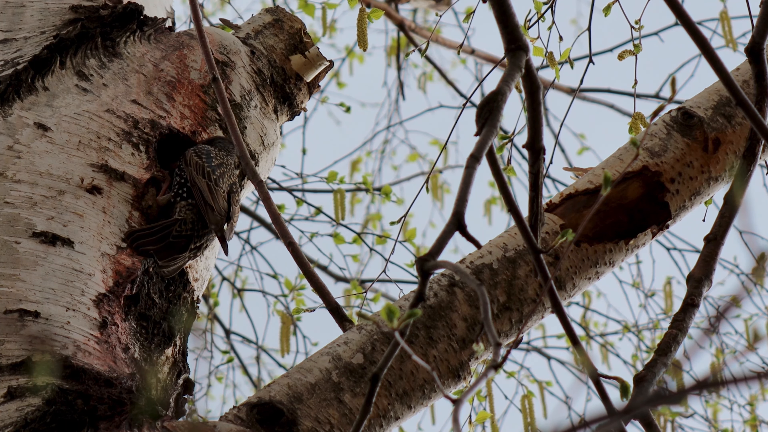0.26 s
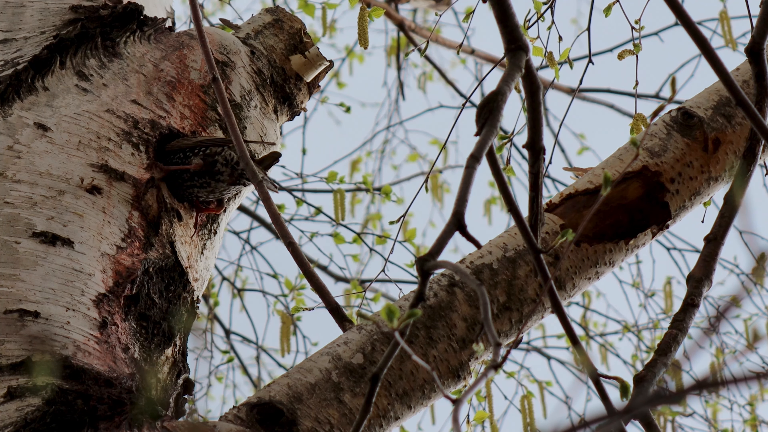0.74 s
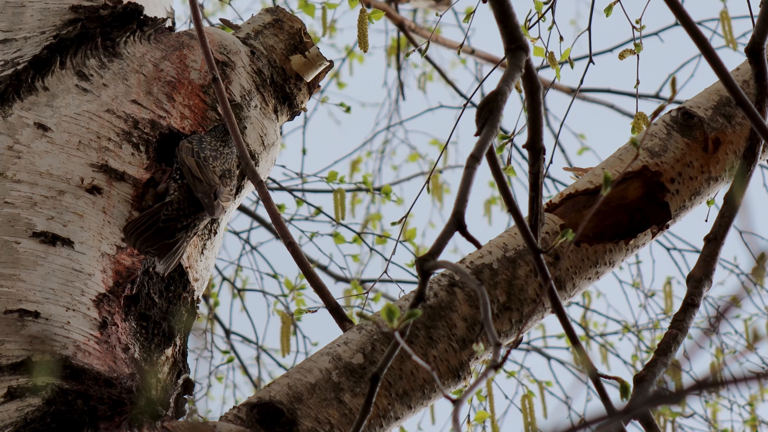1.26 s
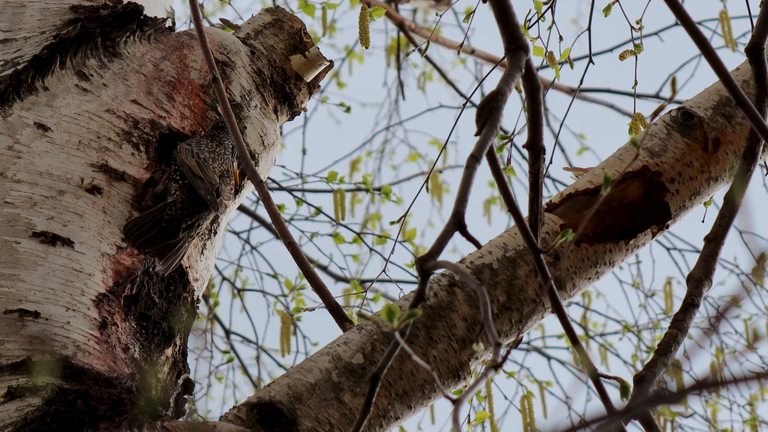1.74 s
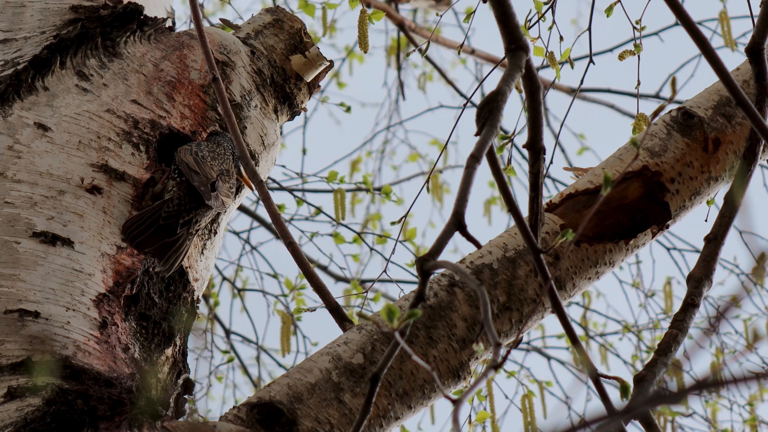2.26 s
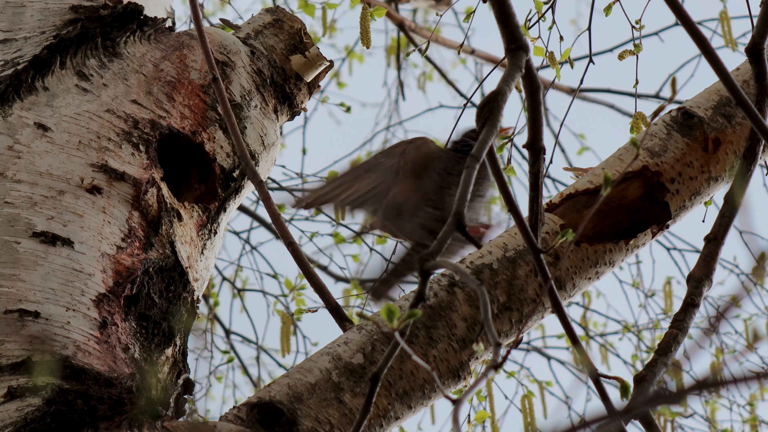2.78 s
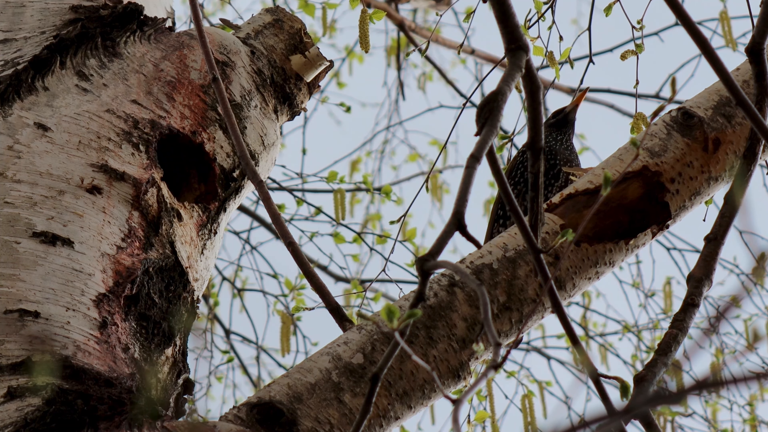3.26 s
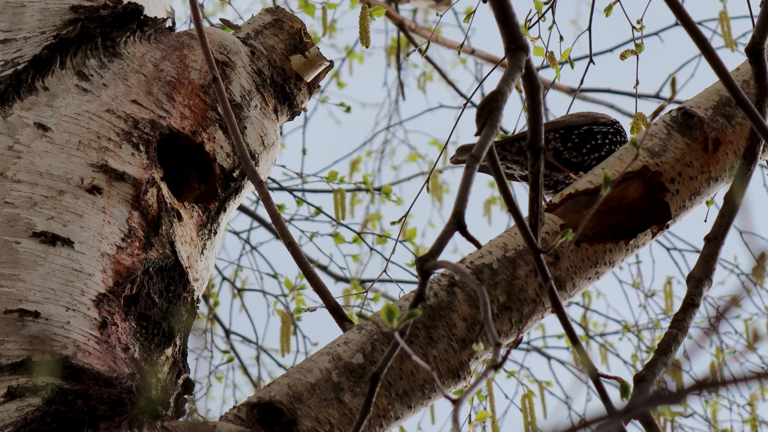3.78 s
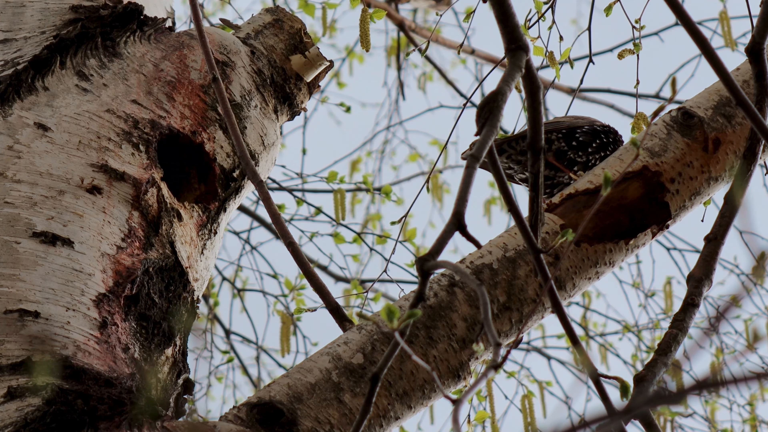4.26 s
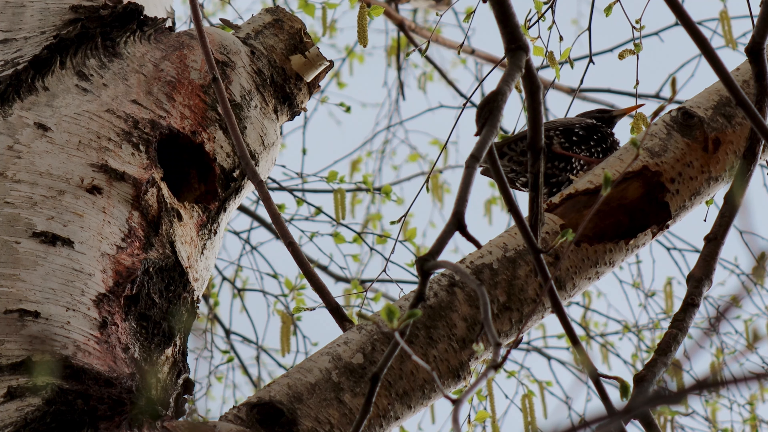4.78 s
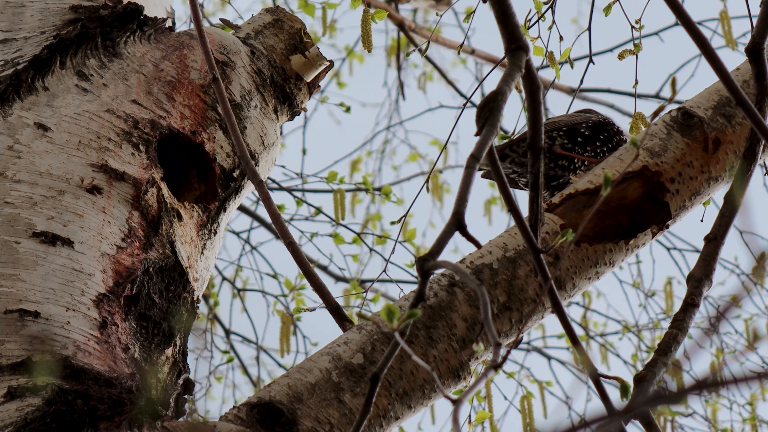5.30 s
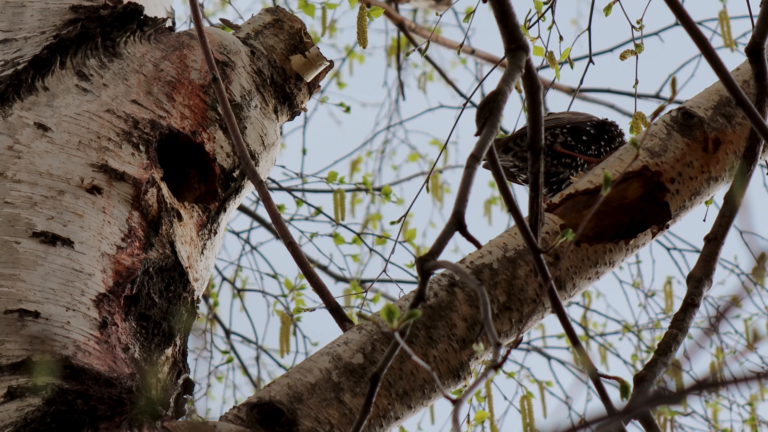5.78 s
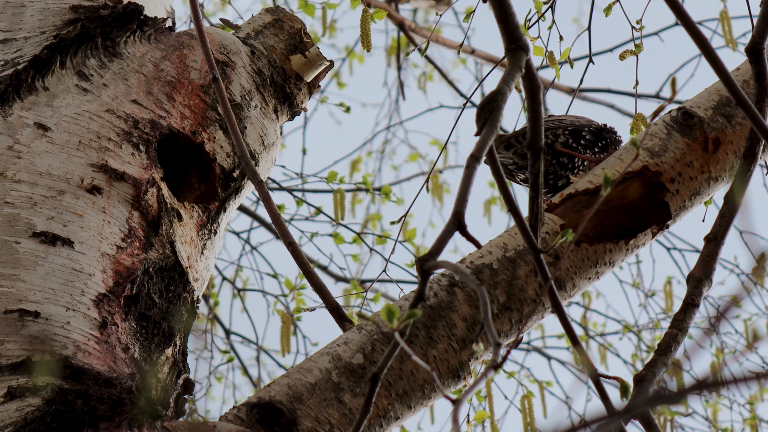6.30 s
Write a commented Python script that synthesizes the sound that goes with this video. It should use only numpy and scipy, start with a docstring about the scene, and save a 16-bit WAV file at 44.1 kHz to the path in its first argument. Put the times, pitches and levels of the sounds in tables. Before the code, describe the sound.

Small birds twitter, whistle and chip among trees over a soft distant hum, while a nearby starling's claws click and its feathers rustle.

```python
"""Among trees, a stereo microphone close to a starling on a trunk, over a soft distant hum. Small warblers
twitter further off from the start, and a fluting whistler soon joins, their songs smeared by trunk echoes.
The starling's claws click and its feathers rustle as it moves about and hops to a branch; near 3 s and
3.8 s its wings and feet rattle the wood. From 3.4 s a caller gives falling chips, and the whistler
turns to long sagging notes and double-peaked trills."""
import sys
import numpy as np
from scipy import signal
from scipy.fft import rfft, irfft, next_fast_len
from scipy.io import wavfile
from scipy.ndimage import uniform_filter1d

SR = 44100
rng = np.random.default_rng(int(sys.argv[2]) if len(sys.argv) > 2 else 0)


def wav_record(signal):
    """Record a signal, one row per channel, as 16-bit PCM in the file named by sys.argv[1]."""
    frames = np.transpose(np.atleast_2d(signal))
    bounded = np.clip(frames, -1, 1)
    # unit amplitude maps onto the largest positive 16-bit level
    quanta = np.round(bounded * 32767).astype(np.int16)
    wavfile.write(sys.argv[1], SR, quanta)


N = 288414
TIME = np.arange(N) / SR

# The starling, close to the microphone. Levels in all tables are relative.
CLAW_CLICKS = [(0.744, -60, 8800, -70), (.757, -60.5, 10500, -74), (0.836, -61, 9800, -54),
               (1.317, -46.5, 11300, -68), (1.376, -46, 11000, -72), (1.398, -50, 11300, -66),
               (2.772, -57, 8400, -73), (2.864, -56, 13000, -70), (2.948, -45, 8240, -52),
               (2.99, -63, 13000, -47), (3.756, -56, 14160, -74), (3.769, -47, 14500, -50),
               (3.798, -59, 11500, -64), (3.81, -54, 11500, -38), (3.845, -49, 12900, -34)]  # claws on bark: t/s, crack level/dB, bright ring f/Hz, knock level/dB
WOOD_MODES = [(1320, -13, 0.024), (1730, 1, 0.0041), (1900, 0, 0.0045), (3240, -6, 0.0026),
              (4640, -2.5, 0.0013)]  # resonances of the wood: f/Hz, level/dB, t60/s
STROKES = [(2.946, -38.5), (3.814, -44), (3.846, -40)]  # wing and foot strokes that rattle the wood: t/s, level/dB
SWISHES = [(.43, -75), (.62, -71), (.75, -69), (.84, -74), (1.325, -69), (1.36, -68), (1.4, -68),
           (2.72, -66.5), (2.78, -64.5), (2.865, -70), (2.945, -64), (3.025, -68), (3.76, -68), (3.8, -68),
           (3.85, -66)]  # swishes of feathers and feet: t/s, level/dB
FEATHER_SPECTRUM = [(2500, -31), (4000, -18), (6000, 0.5), (8000, 0.5), (10000, -5), (12500, -2.5),
                    (15700, -0.5)]  # colour of the swishes: f/Hz, density/dB

# The whistler, off among the trees.
# glides: t/s, length/s, first f/Hz, middle f/Hz, last f/Hz, first level/dB, last level/dB, hoarseness
WHISTLER_GLIDES = [(.68, 0.059, 2280, 1896, 1550, -54, -68.5, 0.4),
                   (.845, 0.12, 2237, 2001, 1905, -58.5, -61, 0.42),
                   (1.175, .12, 1680, 2073, 2650, -56, -47, 0.42),
                   (1.295, 0.098, 2652, 2034, 1695, -47, -63, 0.37),
                   (2.595, 0.16, 2050, 1860, 1553, -60.5, -66.5, 0.42),
                   (2.77, 0.05, 2227, 2020, 2020, -53, -54.5, 0.7),
                   (2.822, 0.031, 2570, 2293, 1980, -53, -46, 1),
                   (2.862, .028, 2663, 2346, 2110, -48, -45.5, 0.94),
                   (2.89, 0.0284, 2220, 2373, 2120, -46.5, -60, 0.88),
                   (2.993, 0.038, 2187, 2110, 2120, -48, -46.5, 0.36),
                   (3.04, 0.066, 2250, 2424, 2145, -52, -51.5, 0.36),
                   (3.11, .14, 2053, 2190, 2003, -49, -50.5, 0.28),
                   (4.345, 0.076, 2410, 2079, 1847, -72, -59.5, 0.36)]
WHISTLER_SAGS = [(3.452, 0.23, -54), (3.792, 0.25, -55.5), (4.658, 0.23, -52), (4.992, 0.24, -51.5)]  # long sagging whistles: t/s, length/s, level/dB
WHISTLER_TRILLS = [(4.123, 1.01, -39.5), (5.375, .98, -40)]  # loud double-peaked whistles: t/s, time stretch, level/dB
TRILL_SHAPE = [(0, 2200, -13), (0.033, 2959, -1.5), (.052, 2833, -2), (.068, 2419, 1.3), (.093, 2904, 3.1),
               (.114, 2650, -22), (.138, 2265, -5.5), (.17, 2419, -3), (.214, 2405, -26)]  # course of one trill: t/s from its start, f/Hz, level/dB
WHISTLER_HARMONICS = [(1, 5), (2, -46)]  # timbre: multiple, level/dB
WHISTLER_SIDE = [(0, -7.5), (2.5, -7.5), (4.5, -5.5), (6.54, -5.5)]  # bearing from the microphone: t/s, left minus right/dB
WHISTLER_ECHOES = [(.021, -8.5, -14), (.042, -9, -14)]  # off nearby trunks: delay/s, left/dB, right/dB

# The chip caller, moving between perches.
CHIP_CALLS = [(3.423, 0.017, 4120, -62, -46.5, -57), (3.483, 0.02, 4410, -53, -41.5, -52.5),
              (4.391, .018, 4020, -50, -38, -52), (4.459, 0.026, 4220, -62, -34.5, -58),
              (4.562, 0.029, 4380, -66, -39.5, -58), (4.645, 0.027, 4144, -52, -38.5, -53),
              (4.734, 0.035, 4315, -49.5, -38, -57), (4.825, 0.025, 4240, -56.5, -33, -50),
              (5.139, 0.016, 3810, -49, -50, -55.5), (5.233, 0.027, 4490, -52, -40.5, -51.5),
              (5.313, .027, 4200, -47.5, -35, -54), (5.396, 0.023, 4340, -46, -37.5, -52.5),
              (5.495, .025, 4365, -48, -39.5, -45), (5.631, 0.022, 4035, -58, -40.5, -50.5),
              (5.735, .025, 3975, -52, -41, -59.5), (6.037, 0.015, 3800, -49, -49, -52),
              (6.103, 0.021, 4120, -57, -42.5, -64), (6.18, 0.021, 4087, -56.5, -42, -61),
              (6.295, 0.026, 3990, -57, -47.5, -69), (6.515, 0.021, 3880, -63, -50.5, -65)]  # chips: t/s, length/s, first f/Hz, first level/dB, peak level/dB, last level/dB
CHIP_HARMONICS = [(1, 1.5), (2, -41.5), (3, -39)]  # timbre: multiple, level/dB
CALLER_SIDE = [(3.4, -2), (4.3, -1), (5.0, -3.5), (5.2, -6.5), (5.8, -6.5), (6.0, -7.5), (6.54, -6)]  # bearing: t/s, left minus right/dB
CALLER_PERCHES = [(0, 5.19, .0135, -12, -14, -4.5), (5.19, 5.6, .0135, -3, -7, -3),
                  (5.6, 6.0, .016, -3, -8, -2), (6.0, 6.6, .017, -3, -5, 1)]  # perches: from t/s, to t/s, echo delay/s, left/dB, right/dB, scatter/dB

# The small birds, deeper in the trees.
# glides: t/s, length/s, first f/Hz, middle f/Hz, last f/Hz, first level/dB, last level/dB, hoarseness
WARBLER_GLIDES = [(0, 0.014, 3660, 3165, 2806, -42, -47, 0.42), (.02, 0.22, 3020, 3050, 3060, -73, -70, .2),
                  (.1, 0.079, 4150, 3880, 4100, -66, -60.5, .9),
                  (.19, .06, 6500, 6620, 6630, -82, -83, 0.16),
                  (.34, 0.059, 6390, 6330, 6240, -71, -67, 0.04),
                  (.39, .03, 5300, 4600, 4020, -72, -64, 1.04),
                  (.425, 0.098, 4040, 3980, 4060, -56.5, -66.5, 0.62),
                  (.6, 0.032, 3590, 2660, 2740, -59, -64, 0.77),
                  (.72, 0.023, 3790, 3810, 3950, -66, -52, 0.5),
                  (.745, 0.066, 2980, 3180, 3790, -73, -50, .6),
                  (1.02, 0.02, 4220, 4150, 4050, -54, -53, .9),
                  (1.065, 0.043, 2950, 3490, 3400, -62, -58, 0.4),
                  (1.105, 0.021, 3970, 4190, 4430, -52.5, -57, 0.97),
                  (1.13, 0.032, 2840, 3270, 2877, -52, -52, 0.7),
                  (1.16, 0.037, 2890, 2685, 2500, -48, -51, 0.7),
                  (1.397, 0.01, 3630, 3250, 2970, -55, -64, .5),
                  (1.398, 0.012, 11600, 10500, 9600, -65, -70, 0.03),
                  (1.577, 0.029, 3780, 3267, 3140, -54, -42.5, 0.92),
                  (1.607, 0.088, 3160, 3098, 3080, -51.5, -48.5, 0.89),
                  (1.69, 0.067, 3480, 3810, 4040, -43.5, -61.5, 1.1),
                  (1.706, 0.0048, 4900, 4440, 3920, -57, -47, 1.1),
                  (1.725, .007, 5240, 4680, 4260, -70, -60, 1.09),
                  (1.58, .016, 7600, 6840, 6400, -74, -71, 0.8),
                  (1.585, 0.032, 4550, 4700, 4550, -69, -63, 0.95),
                  (1.967, 0.021, 3720, 4070, 3900, -61.5, -56, 0.02),
                  (1.99, 0.069, 3880, 4534, 5550, -46.5, -60, 0),
                  (2.055, 0.083, 5480, 5440, 5670, -67, -60.5, .1),
                  (2.035, 0.026, 4120, 4680, 5000, -48, -65, 0.17),
                  (2.107, 0.027, 5240, 4070, 2355, -54, -49, 0.2),
                  (2.137, 0.053, 2320, 2420, 2460, -56, -52, .12),
                  (2.125, 0.082, 3550, 3355, 3314, -57, -53.5, .12),
                  (2.497, 0.028, 3970, 3090, 3610, -48.5, -45.5, 0),
                  (2.54, .045, 3750, 2730, 2500, -55, -39.5, 0.57),
                  (2.607, 0.051, 3750, 4020, 3150, -62.5, -48, .45),
                  (2.625, .035, 2620, 3050, 3200, -59, -52.5, 0.3),
                  (2.63, 0.021, 5570, 5770, 6340, -64, -66.5, 0.86),
                  (2.7, 0.059, 2990, 2990, 2700, -61.5, -59, 0.5),
                  (3.045, 0.12, 3260, 3330, 3250, -74, -68, 0.1),
                  (3.175, 0.018, 3785, 3920, 3356, -62, -43, 0.87),
                  (3.195, 0.031, 3296, 3450, 3440, -47.5, -54.5, 0.85),
                  (3.675, .04, 3440, 3790, 2880, -52, -57, 0.54),
                  (3.715, 0.014, 2960, 2610, 2400, -50, -53, 0.54),
                  (3.9, 0.019, 3280, 3780, 4410, -49.5, -50, 0.23),
                  (3.915, .02, 3900, 3870, 3840, -58.5, -80, 0.37),
                  (3.992, 0.015, 5080, 5400, 5720, -53.5, -48, 0.38),
                  (4.1, 0.011, 5160, 5430, 5630, -52, -68, 0.28),
                  (4.138, 0.029, 3760, 4360, 3930, -66.5, -70, 0.37),
                  (4.2, 0.035, 3690, 4330, 3530, -67, -49, 0.31),
                  (4.21, 0.044, 6800, 7050, 6900, -77.5, -73, .2),
                  (4.237, 0.023, 3600, 4100, 3480, -61, -56, 0.15),
                  (4.3, 0.03, 4380, 4820, 4400, -55, -68, 0.3),
                  (4.332, 0.0093, 4530, 4040, 3418, -64, -49, 0.1),
                  (4.352, 0.015, 3190, 3540, 3900, -53, -52, .35),
                  (4.375, .013, 3570, 3430, 3300, -46, -52, 0.6),
                  (4.428, .017, 3190, 3460, 3760, -61.5, -48, 0.6),
                  (4.462, .028, 2763, 2930, 3100, -53.5, -47, 0.36),
                  (4.54, 0.039, 2330, 2415, 2460, -58, -53, 0.34),
                  (4.582, 0.016, 3420, 4220, 4830, -56, -61, .5),
                  (4.745, 0.14, 1935, 2400, 2160, -59, -56, 0),
                  (4.985, 0.035, 3990, 4390, 2910, -55, -48, 0.95),
                  (5.05, 0.053, 3510, 3750, 2630, -58, -56, 0.86),
                  (5.137, 0.014, 12280, 10220, 8470, -64, -74, 0.2),
                  (5.175, 0.07, 3030, 3114, 3100, -61, -70, 0.2),
                  (5.452, .03, 3860, 4360, 3787, -56, -55, 0.2),
                  (5.455, .065, 7000, 7150, 6960, -73, -75, 0.4),
                  (5.645, 0.032, 3600, 3740, 3510, -41.5, -71, .18),
                  (5.945, 0.023, 4380, 4430, 4400, -57, -55, .6),
                  (5.955, 0.031, 3460, 3770, 3050, -45, -64, 0.85),
                  (5.985, 0.039, 3150, 3440, 3650, -65, -48, 0.7),
                  (6.405, 0.03, 4130, 4370, 3940, -72, -56, 0.6),
                  (6.435, 0.017, 3660, 3900, 4037, -61, -54, 0.67),
                  (6.485, 0.01, 3920, 3410, 2770, -70, -57, 0.74)]
RASP_OPENINGS = [(2.435, 4730, -61, -51.5, 0.19), (3.111, 5010, -60, -55, 0.8),
                 (3.585, 4720, -66.5, -51.5, 0.24), (4.931, 4880, -59, -56, .5),
                 (5.895, 4950, -58.5, -49, 0.23)]  # rasp onsets: t/s, held f/Hz, held level/dB, drop level/dB, hoarseness
WARBLER_HARMONICS = [(1, -2), (2, -36.5)]  # timbre: multiple, level/dB
WARBLER_SIDE = [(0, 3.5), (.55, 4.5), (.62, 5), (1.4, -7.5), (1.55, -7), (3.85, -6.5), (3.9, 7), (4.12, -3),
                (4.15, -6), (6.54, -7.5)]  # bearing: t/s, left minus right/dB
WARBLER_ECHOES = [(.017, -19, -11.5), (.036, -15, -23)]  # off nearby trunks: delay/s, left/dB, right/dB
HIGH_ARCS = [(1.746, 0.018, 8800, -61.5), (1.791, 0.024, 8800, -65), (1.848, 0.028, 8600, -62.5)]  # thin arching notes: t/s, length/s, top f/Hz, level/dB
HIGH_ARC_ECHOES = [(0.019, -10.5, -1)]  # off a trunk: delay/s, left/dB, right/dB
# blurred twitter, low and high: t/s, hold/s, first level/dB, last level/dB, first f/Hz, last f/Hz, spread
LOW_BURSTS = [(0, 0.0039, -29, -57.5, 3570, 3300, 0.42), (.13, 0.25, -61.5, -67, 3836, 3520, 0.14),
              (.42, 0.18, -56.5, -64.5, 4180, 4130, 0.2), (.54, .03, -64, -64, 3300, 3180, .2),
              (.6, 0.17, -53.5, -55.5, 3375, 3805, 0.29), (.78, 0.16, -53, -57.5, 3775, 3570, 0.22),
              (1.0, 0.088, -52, -58, 4130, 4030, 0.24), (1.1, 0.097, -54.5, -50.5, 3790, 3025, 0.24),
              (1.66, 0.066, -57.5, -54.5, 3274, 3630, 0.26), (2.1, 0.053, -63, -51.5, 4370, 3410, 0.34),
              (2.49, 0.14, -52, -57, 3760, 3530, 0.21), (2.65, 0.043, -54.5, -47, 3440, 3183, 0.28),
              (2.78, 0.099, -62, -70.5, 3120, 2840, 0.27), (3.13, 0.091, -60, -51, 4080, 3446, 0.26),
              (3.48, 0.085, -64, -61, 3670, 3520, 0.21), (3.61, 0.092, -54.5, -47.5, 4100, 3790, 0.22),
              (3.75, 0.13, -56, -62, 3730, 3560, 0.3), (4.01, 0.0054, -55, -72, 4980, 4930, 0.19),
              (4.1, 0.19, -70, -54, 2910, 2820, 0.4), (4.35, 0.23, -54, -62.5, 3600, 3420, .25),
              (4.59, 0.043, -54, -52, 4000, 3440, 0.25), (4.96, 0.11, -56, -54.5, 4070, 3600, .2),
              (5.25, 0.086, -67, -61, 3870, 3466, 0.28), (5.41, 0.074, -41, -49, 2935, 2786, 0.29),
              (5.63, 0.16, -65, -61, 3540, 3370, .23), (5.92, 0.042, -54, -46.5, 4170, 3655, 0.21),
              (6.06, 0.13, -55, -58, 3436, 3410, 0.19), (6.43, 0.091, -60.5, -55, 4070, 3186, 0.22)]
HIGH_BURSTS = [(0, 0.0045, -51, -61, 5050, 5190, 0.12), (.41, 0.073, -66, -76.5, 5070, 4850, 0.047),
               (.6, 0.2, -69, -61.5, 5080, 5270, 0.08), (.9, 0.32, -70.5, -66.5, 5000, 5050, 0.12),
               (1.12, .03, -65, -71, 5700, 5900, .1), (2.46, 0.26, -57.5, -72, 4680, 4590, 0.062),
               (3.65, 0.14, -76, -59, 5860, 5830, 0.12), (4.96, 0.12, -57, -65, 4760, 4470, .04),
               (5.4, .04, -66, -67.5, 5730, 5580, .2), (5.92, 0.074, -61, -66, 4900, 4550, .04)]

# The background.
DISTANT_TONES = [(3.55, 0.42, 610, -77), (4.75, 0.23, 675, -82), (4.9, .55, 1082, -83),
                 (4.95, 0.18, 537, -80.5), (5.28, 0.35, 539, -77), (5.35, 0.14, 678, -77),
                 (6.0, 0.52, 505.4, -83), (6.15, 0.42, 678, -79), (6.1, 0.53, 1090, -77.5)]  # faint held tones: t/s, length/s, f/Hz, level/dB
HUM_SPECTRUM = [(24, -79), (40, -35), (158, -36), (371, -4), (500, 2.5), (1060, 2.5), (1620, -2.5),
                (2480, -2), (3350, -8), (3890, -5.5), (5530, -11.5), (8670, -16), (14700, -20.5),
                (15800, -18)]  # colour of the distant hum: f/Hz, density/dB
STEREO_LIKENESS = [(60, 0.39), (150, .8), (300, 0.96), (600, 0.45), (1500, 0), (15000, 0.034)]  # noise at the microphone: f/Hz, left-right correlation


def claws():
    """Close up, a claw cracks on bark with a bright ring and knocks the wood; strokes rattle it."""
    out, knocks = np.zeros(N), np.zeros(N)
    for s, crack_db, hz, knock_db in CLAW_CLICKS:
        crack, at = np.zeros(N), round(s * SR)
        crack[at:at + 40] = from_db(crack_db) * rng.standard_normal(40) * np.exp(-np.arange(40) / 24)
        out += 0.54 * ring(crack, hz, t60=0.0023) + 0.21 * crack
        knocks[at] = from_db(knock_db)
    knocks += 0.063 * movements(STROKES, rise_db_per_s=2200, fall_db_per_s=330) * rng.standard_normal(N)
    out += sum(from_db(db) * ring(knocks, hz, t60) for hz, db, t60 in WOOD_MODES)
    return high_pass(out, hz=1050, order=6)  # small things radiate no bass


def feathers():
    """Soft bright swishes as the starling moves, just right of the microphone."""
    swell = movements(SWISHES, rise_db_per_s=352, fall_db_per_s=375)
    flutter = from_db(2.5 * drift(120))
    return swell * flutter * banded_noise(FEATHER_SPECTRUM, flicker_db=3) * from_db([[-1], [1]])


def movements(rows, rise_db_per_s, fall_db_per_s):
    """Gain over time: each movement swells to its peak and dies."""
    gain = sum(from_db(np.interp(TIME, [s - 1, s, s + 1], [db - rise_db_per_s, db, db - fall_db_per_s]))
               for s, db in rows)
    return uniform_filter1d(gain, size=150)


def whistler():
    """Off to the right: fluting glides, whistles that scoop up and sag, and double-peaked trills."""
    foot_hz, top_hz, rise_s, sag_hz_per_s = 1777, 1910, 0.0289, 1050
    sag_hoarse, trill_hoarse = 0.6, 0.44
    song = glides(WHISTLER_GLIDES)
    for s, length, db in WHISTLER_SAGS:
        end_hz = top_hz - sag_hz_per_s * (length - rise_s)
        sag = [(s, foot_hz, db - 2.5), (s + rise_s, top_hz, db + 4), (s + length, end_hz, db)]
        song.append((sag, sag_hoarse))
    for s, stretch, db in WHISTLER_TRILLS:
        trill = [(s + stretch * t, hz, db + step_db) for t, hz, step_db in TRILL_SHAPE]
        song.append((trill, trill_hoarse))
    whistles = sing(song, WHISTLER_HARMONICS, edge_s=.009, waver=.022, rough=.9)
    return woods(whistles, bearing(WHISTLER_SIDE), WHISTLER_ECHOES, lag_s=.00022, scatter_db=-6, t60=.33)


def chip_notes():
    """A chip swells to its peak while it falls, then falls faster and fades."""
    peak_s, early_hz_per_s, late_hz_per_s = 0.0114, 60600, 75300
    notes = []
    for s, length, hz, first_db, peak_db, last_db in CHIP_CALLS:
        peak_hz = hz - early_hz_per_s * peak_s
        tail_s = max(length - peak_s, .001)
        notes.append([(s, hz, first_db), (s + peak_s, peak_hz, peak_db),
                      (s + peak_s + tail_s, peak_hz - late_hz_per_s * tail_s, last_db)])
    return notes


def chip_caller():
    """The caller moves between perches; each has its own strong trunk echo and share of scatter."""
    chips = voice(chip_notes(), CHIP_HARMONICS, edge_s=.003, waver=.01, rough=.3)
    echo, scatter_db = 0, np.zeros(N)
    for start, end, delay, left_db, right_db, perch_db in CALLER_PERCHES:
        here = (TIME >= start) * (TIME < end)
        echo = echo + np.outer(from_db([left_db, right_db]), np.interp(TIME - delay, TIME, chips * here))
        scatter_db += perch_db * here
    # the perch's gain cancels in the direct sound and acts on the scatter alone
    return echo + woods(chips * from_db(scatter_db), bearing(CALLER_SIDE), lag_s=-0.000034,
                        direct_db=-scatter_db, scatter_db=0, t60=0.2)


def warblers():
    """Quick glides from either side; a rasping call opens with a leap to a held note and a drop."""
    leap_from_hz, leap_s, hold_s = 3350, 0.00715, 0.019
    drop_from_hz, drop_to_hz, drop_after_s, drop_s = 4550, 3170, .033, .017
    song = glides(WARBLER_GLIDES)
    for s, hz, held_db, drop_db, hoarse in RASP_OPENINGS:
        held_at, drop_at = s + leap_s, s + drop_after_s
        leap = [(s, leap_from_hz, held_db - 21), (held_at, hz, held_db), (held_at + hold_s, hz, held_db)]
        drop = [(drop_at, drop_from_hz, drop_db), (drop_at + drop_s, drop_to_hz, drop_db - 7)]
        song += [(leap, hoarse), (drop, hoarse)]
    warbles = sing(song, WARBLER_HARMONICS, edge_s=.004, waver=.04, rough=.9)
    return woods(warbles, bearing(WARBLER_SIDE), WARBLER_ECHOES, lag_s=.0002,
                 direct_db=0.19, scatter_db=-1.7, t60=0.21)


def high_arcs(foot_hz=4640, top_dip_db=15.5):
    """A small bird's thin notes shoot up and drop back on a parabola, faintest at the top."""
    along = np.linspace(0, 1, num=7)
    height = 1 - (2 * along - 1) ** 2
    dip_db = top_dip_db * height ** 2
    notes = [np.transpose([s + length * along, foot_hz + (hz - foot_hz) * height, db - dip_db])
             for s, length, hz, db in HIGH_ARCS]
    return voice(notes, [(1, 0)], edge_s=.003, waver=.003, rough=.15)


def twitter(rows, per_s, sweep_s, glide_share):
    """A far crowd of short, hoarse random glides around a wandering pitch."""
    t, level_db, hz, spread = bursts(rows)
    count = int(per_s * N / SR)
    jitter, height, slope, loudness = rng.random((count, 4)).T
    starts = (np.arange(count) + jitter) / per_s
    pitches = np.interp(starts, t, hz) * np.exp(np.interp(starts, t, spread) * (2 * height - 1))
    falls = glide_share * (1.42 * slope - .4)  # most glides go down
    notes = [[(s, pitch * (1 + fall), db), (s + sweep_s, pitch * (1 - fall), db)]
             for s, pitch, fall, db in zip(starts, pitches, falls, 3 * loudness)
             if np.interp(s, t, level_db) > -86]
    crowd = voice(notes, [(1, 0)], edge_s=.004, waver=.015, rough=.6)
    return crowd / np.sqrt(2 * per_s * sweep_s) * from_db(np.interp(TIME, t, level_db))


def bursts(rows, rise_db_per_s=329, fall_db_per_s=170):
    """Bursts of twitter rise, hold and fall; the loudest sets level, pitch and pitch spread."""
    t = np.arange(0, N / SR + .005, .005)
    level_db = np.array([np.interp(t, [s - 1, s, s + hold, s + hold + 1],
                                   [first_db - rise_db_per_s, first_db, last_db, last_db - fall_db_per_s])
                         for s, hold, first_db, last_db, *_ in rows])
    hz = np.array([np.interp(t, [s, s + hold], [first_hz, last_hz])
                   for s, hold, _, _, first_hz, last_hz, _ in rows])
    loudest = level_db.argmax(axis=0)
    return t, level_db.max(axis=0), hz[loudest, np.arange(len(t))], np.array(rows)[loudest, -1]


def glides(rows, swell_db=2.5):
    """Notes that slide and swell through a middle pitch, each paired with its hoarseness."""
    return [([(s, first_hz, first_db), (s + length / 2, middle_hz, (first_db + last_db) / 2 + swell_db),
              (s + length, last_hz, last_db)], hoarse)
            for s, length, first_hz, middle_hz, last_hz, first_db, last_db, hoarse in rows]


def sing(song, harmonics, edge_s, waver, rough):
    """Each note sets how hoarse the voice is until the next one starts."""
    song = sorted(song)
    starts, note_hoarse = np.transpose([(note[0][0] - edge_s, hoarse) for note, hoarse in song])
    current = np.maximum(np.searchsorted(starts, TIME) - 1, 0)
    hoarse = np.clip(note_hoarse, 0, 1.2)[current]
    return voice([note for note, _ in song], harmonics, edge_s, waver * hoarse, rough * hoarse)


def voice(notes, harmonics, edge_s, waver, rough):
    """Each note glides through points (t/s, f/Hz, level/dB); pitch wavers and strength trembles."""
    out = np.zeros(N + SR)
    wobble = np.pad(waver * drift(116), (0, SR))
    tremble = np.pad(rough * drift(110), (0, SR))
    smooth = round(edge_s * SR) + 1  # the syrinx rounds the corners of a glide
    for note in notes:
        s, hz, level_db = np.transpose(note)
        first = max(round((s[0] - edge_s) * SR), 0)
        t = np.arange(first, round((s[-1] + edge_s) * SR)) / SR
        span = slice(first, first + len(t))
        fade = np.clip(np.minimum(t - s[0], s[-1] - t) / edge_s + 1, 0, 1) ** 2
        pitch = uniform_filter1d(np.interp(t, s, hz), smooth) * (1 + wobble[span])
        phase = 2 * np.pi * (np.cumsum(pitch) / SR + rng.random())
        wave = sum(from_db(db) * np.sin(k * phase) for k, db in harmonics) * (1 + tremble[span])
        out[span] += np.sqrt(2) * wave * fade * from_db(np.interp(t, s, level_db))
    return out[:N]


def woods(x, side_db, echoes=(), *, lag_s=0, direct_db=0, scatter_db, t60):
    """Paths to the microphone: direct sound (left lagging by lag_s), trunk echoes, a dying scatter."""
    t = np.arange(SR) / SR
    scatter = rng.standard_normal((2, SR)) * from_db(-60 * t / t60) * np.clip(t / 0.014, 0, 1)
    paths = from_db(scatter_db) * scatter / np.sqrt(np.sum(scatter ** 2, axis=1, keepdims=True))
    for delay, left_db, right_db in echoes:
        paths[:, round(delay * SR)] += from_db([left_db, right_db])
    size = next_fast_len(N + SR)
    wet = irfft(rfft(x, size) * rfft(paths, size), size)[:, :N]
    direct = np.array([np.interp(TIME - lag_s, TIME, x), x]) * from_db(direct_db)
    return direct * from_db(np.outer([.5, -.5], side_db)) + wet * from_db(np.outer([.2, -.2], side_db))


def far_tones():
    """Soft steady tones in the distance that barely rise out of the hum."""
    notes = [[(s, hz, db), (s + length, hz, db)] for s, length, hz, db in DISTANT_TONES]
    return voice(notes, [(1, 0)], edge_s=.05, waver=.002, rough=.1)


def distant_hum(level_db=-64.5):
    """The bed of the place: soft, nearly steady noise from far off."""
    return from_db(level_db) * banded_noise(HUM_SPECTRUM, flicker_db=0.1)


def banded_noise(spectrum, flicker_db):
    """Half-octave bands of stereo noise, each with its own level, flicker and likeness; rms 1."""
    out, edges = 0, 40 * 2 ** np.arange(0, 9.1, .5)
    shared_drift = drift(1.5)
    white = rng.standard_normal((2, 2, N))
    for k, (low, high) in enumerate(zip(edges, edges[1:])):
        if high < spectrum[0][0]:
            continue
        band = signal.butter(2, [low, high], "band", fs=SR, output="sos")
        mid, side = signal.sosfilt(band, white[k % 2])
        hz = np.sqrt(low * high)
        alike = np.clip(at_hz(STEREO_LIKENESS, hz), -1, 1)
        gain = from_db(at_hz(spectrum, hz) + flicker_db * (0.37 * shared_drift + drift(21)))
        out = out + gain * (np.sqrt(1 + alike) * mid + np.sqrt(1 - alike) * side * [[1], [-1]])
    return unit_rms(out)


def ring(clicks, hz, t60):
    """A unit click sets a dying sine ringing."""
    radius, angle = from_db(-60 / (t60 * SR)), 2 * np.pi * min(hz, 16000) / SR
    return signal.lfilter([0, np.sin(angle)], [1, -2 * radius * np.cos(angle), radius ** 2], clicks + 1e-18)


def drift(hz):
    """Random wander: noise low-passed at hz, spread 1."""
    pole = np.exp(-80 * np.pi * hz / SR)  # runs at SR / 40
    slow = signal.lfilter([1], [1, -2 * pole, pole * pole], rng.standard_normal(N // 40 + 2002))[2000:]
    return np.interp(np.arange(N) / 40, np.arange(len(slow)), unit_rms(slow))


def bearing(rows):
    """A bird's left-right balance in dB over time."""
    return np.interp(TIME, *np.transpose(rows))


def at_hz(points, hz):
    """Read a spectrum on a log-frequency axis."""
    freqs, values = np.transpose(points)
    return np.interp(np.log(hz), np.log(freqs + 1), values)


def high_pass(x, hz, order):
    """Roll off the bass."""
    return signal.sosfilt(signal.butter(order, hz, "high", fs=SR, output="sos"), x)


def from_db(db):
    """Decibels to gain."""
    return 10 ** (np.asarray(db) / 20)


def unit_rms(x):
    """Scale to rms 1."""
    return x / np.sqrt(np.mean(x ** 2) + 1e-20)


def scene():
    """From the microphone: the starling close by, singers among the trees, the hum far behind."""
    arcs = high_arcs()
    whistles = whistler()
    crowd = twitter(LOW_BURSTS, per_s=340, sweep_s=0.01612, glide_share=0.206)
    crowd += twitter(HIGH_BURSTS, per_s=160, sweep_s=0.019, glide_share=.06)
    warbles = warblers()
    arcs = woods(arcs, side_db=-3, echoes=HIGH_ARC_ECHOES, lag_s=.0001, scatter_db=1, t60=0.26)
    crowd = woods(crowd, bearing(WARBLER_SIDE), lag_s=.0001, direct_db=-8, scatter_db=-0.55, t60=0.14)
    singers = high_pass(whistles + chip_caller() + warbles + arcs + crowd, hz=1100, order=4)
    starling = woods(claws(), side_db=-2, scatter_db=-9, t60=0.21) + feathers()
    return starling + singers + far_tones() + distant_hum()


def record(dry, cutoff_hz=15750):
    """The microphone signal is cut steeply at the top."""
    return signal.sosfilt(signal.ellip(12, .3, 70, cutoff_hz, fs=SR, output="sos"), dry)


dry = scene()
out = record(dry)
wav_record(out)
```